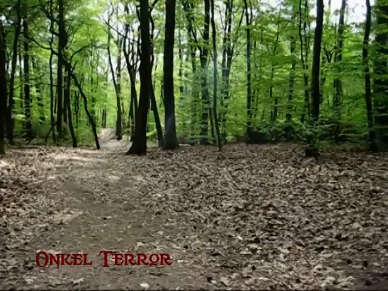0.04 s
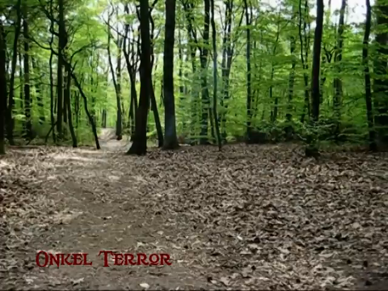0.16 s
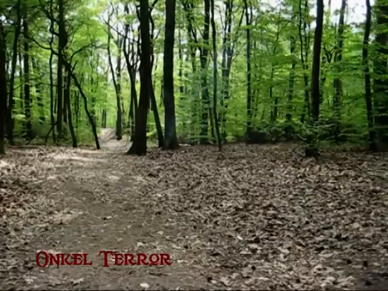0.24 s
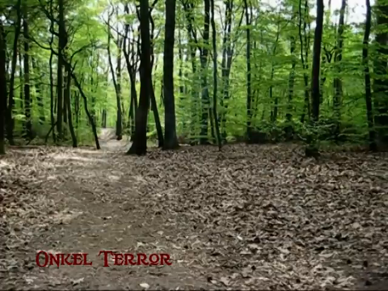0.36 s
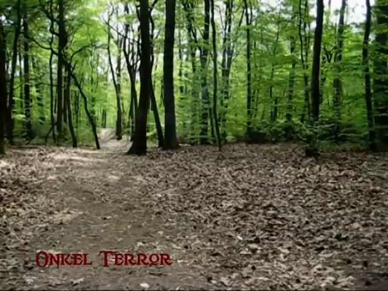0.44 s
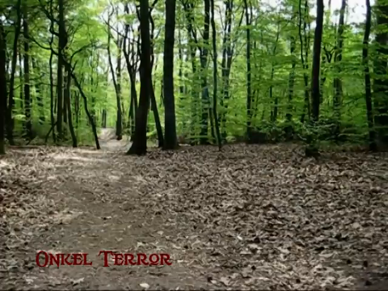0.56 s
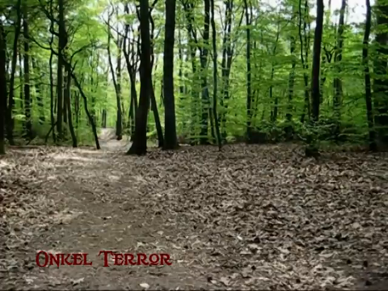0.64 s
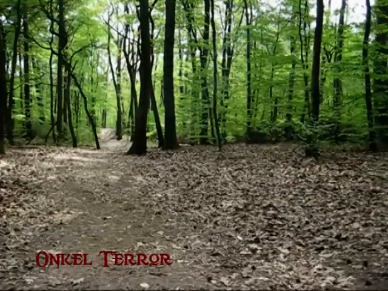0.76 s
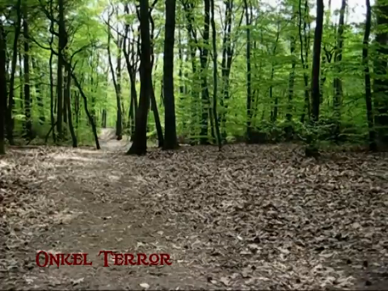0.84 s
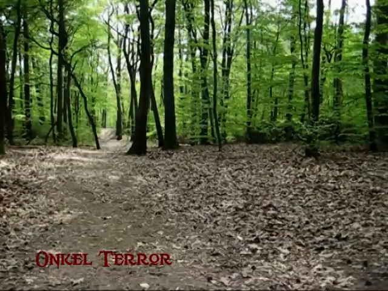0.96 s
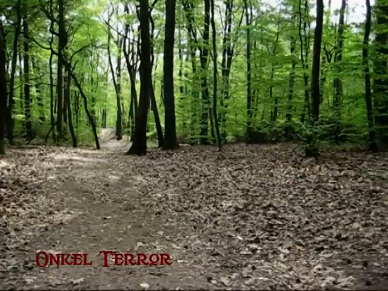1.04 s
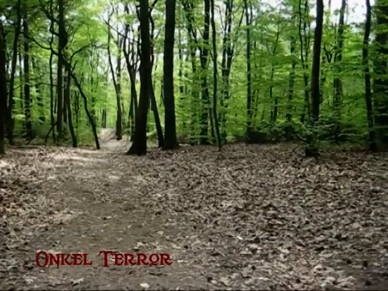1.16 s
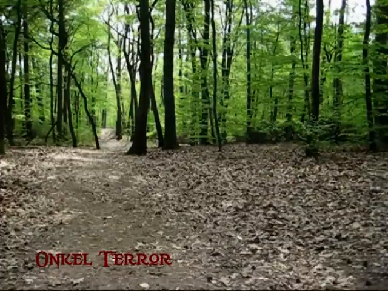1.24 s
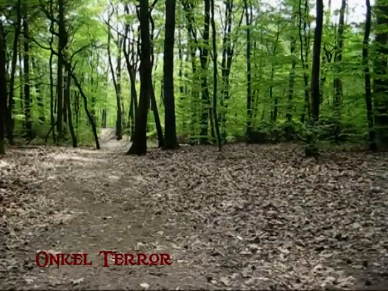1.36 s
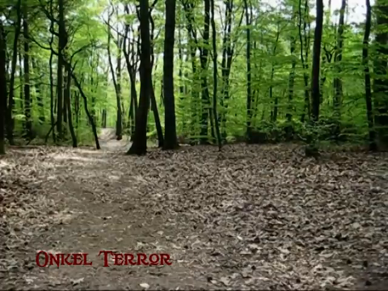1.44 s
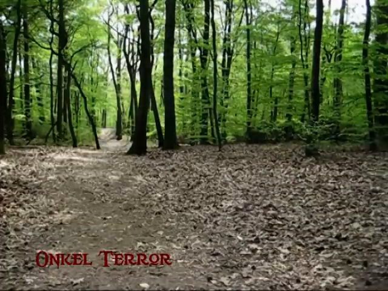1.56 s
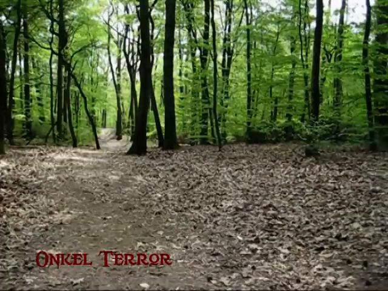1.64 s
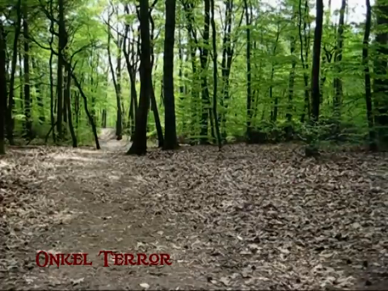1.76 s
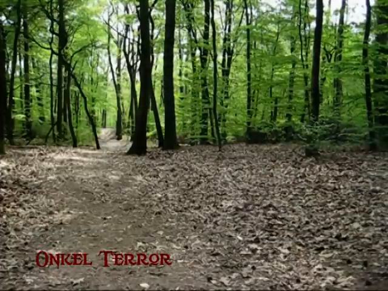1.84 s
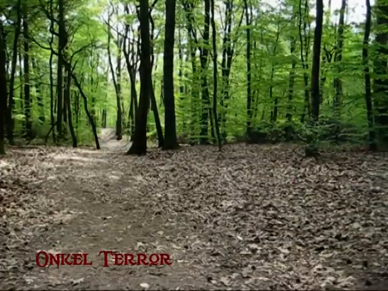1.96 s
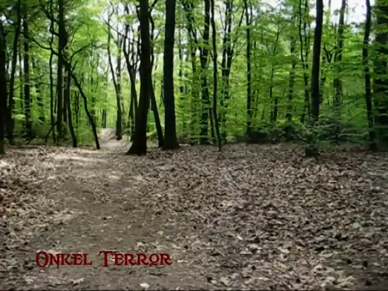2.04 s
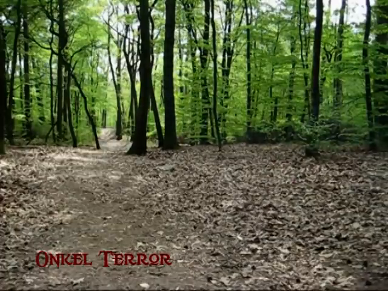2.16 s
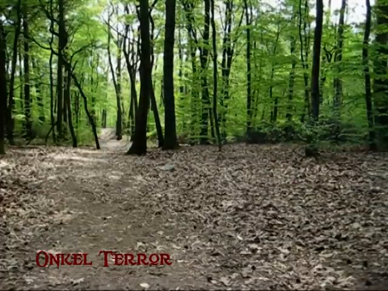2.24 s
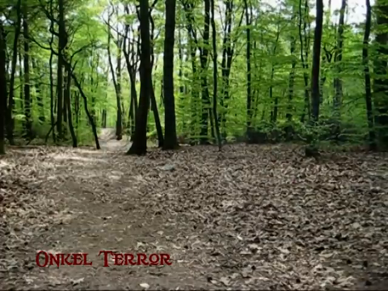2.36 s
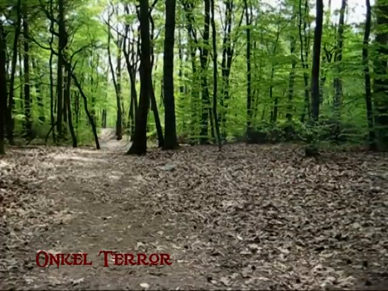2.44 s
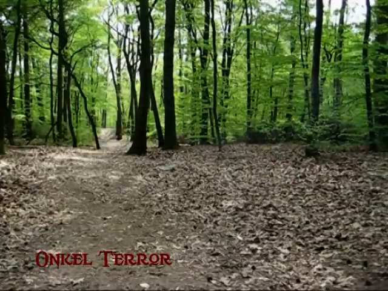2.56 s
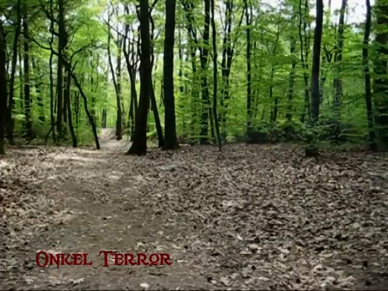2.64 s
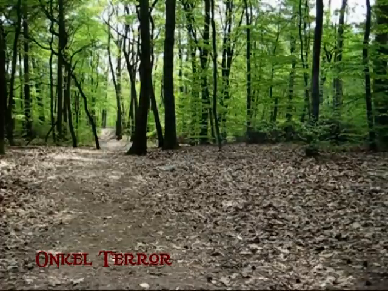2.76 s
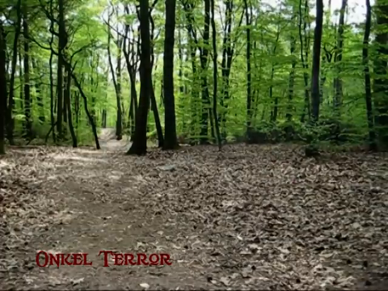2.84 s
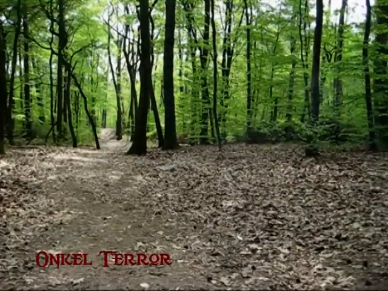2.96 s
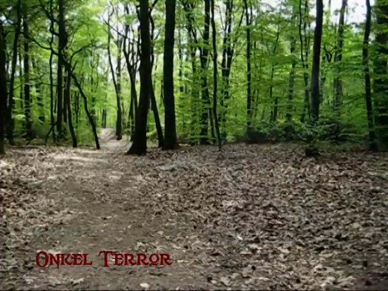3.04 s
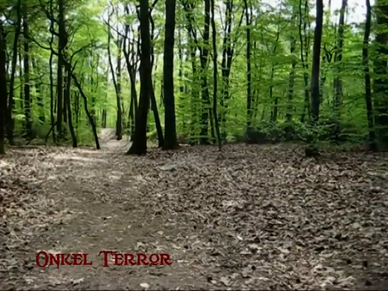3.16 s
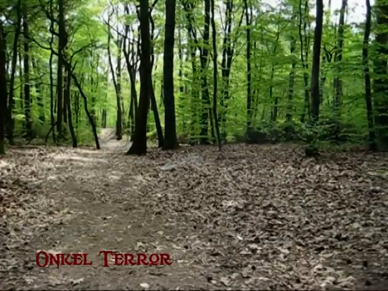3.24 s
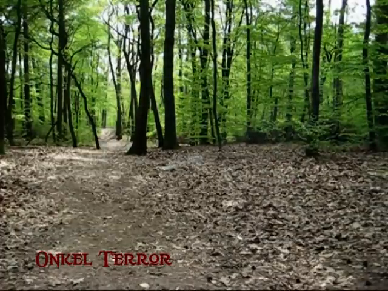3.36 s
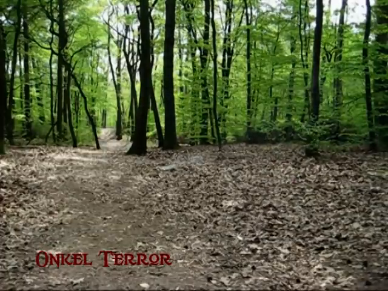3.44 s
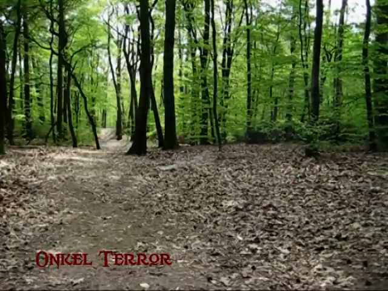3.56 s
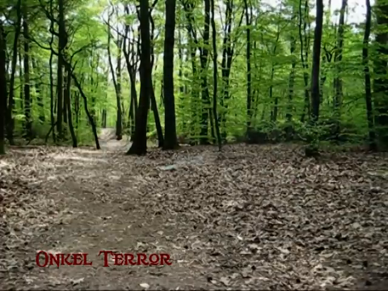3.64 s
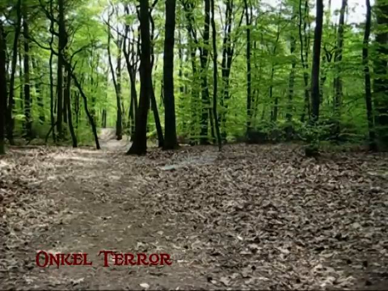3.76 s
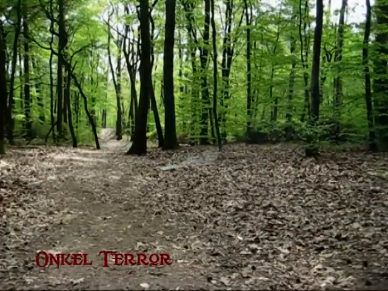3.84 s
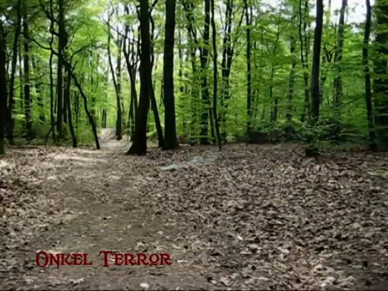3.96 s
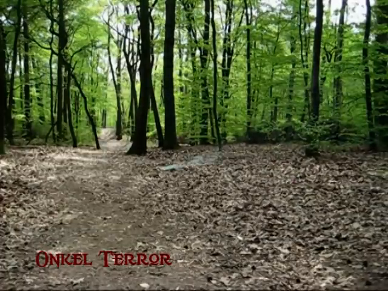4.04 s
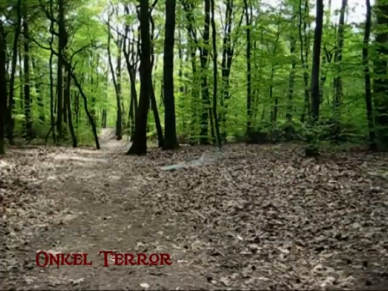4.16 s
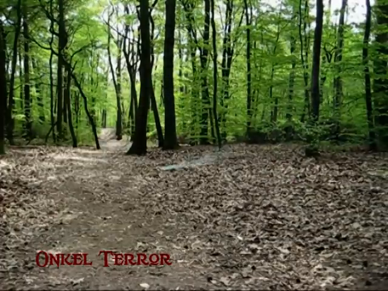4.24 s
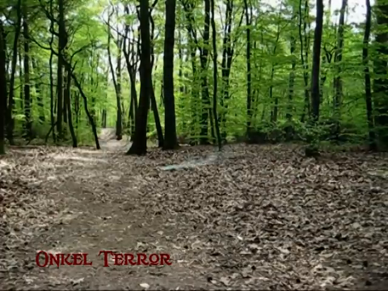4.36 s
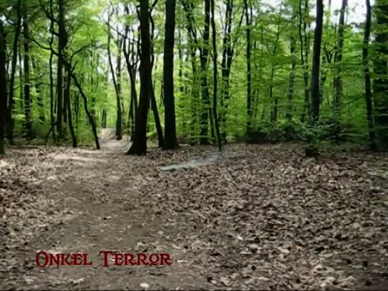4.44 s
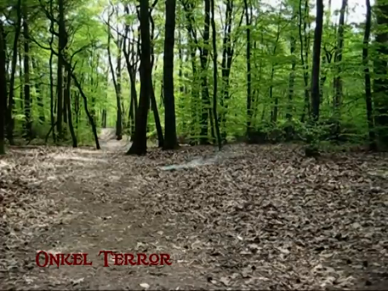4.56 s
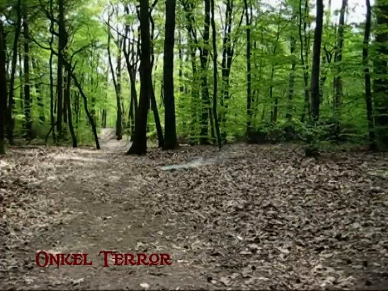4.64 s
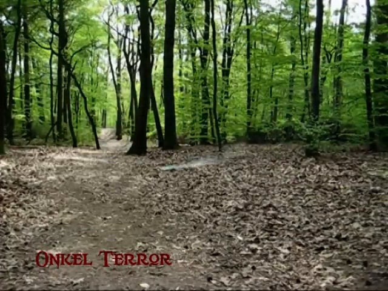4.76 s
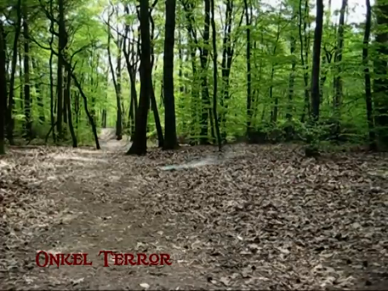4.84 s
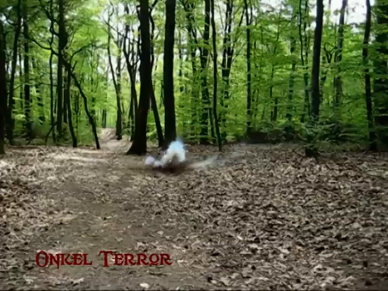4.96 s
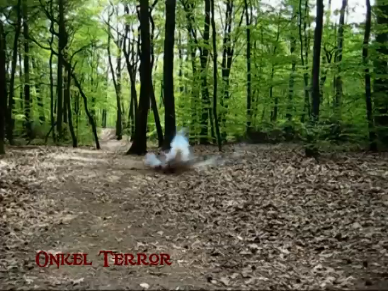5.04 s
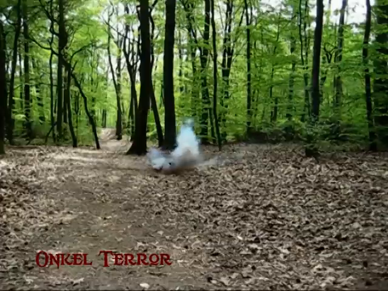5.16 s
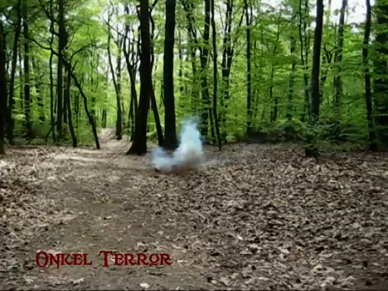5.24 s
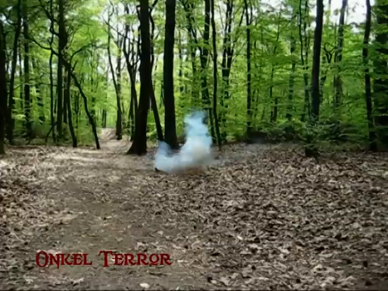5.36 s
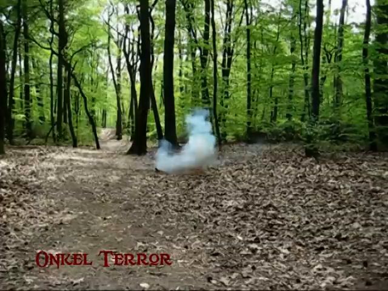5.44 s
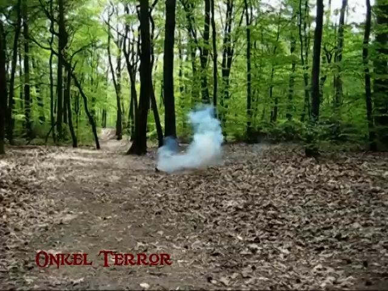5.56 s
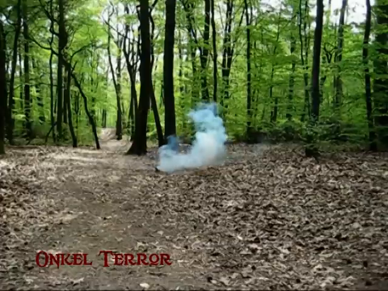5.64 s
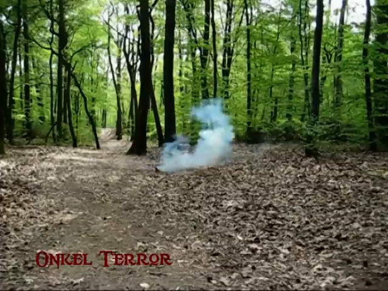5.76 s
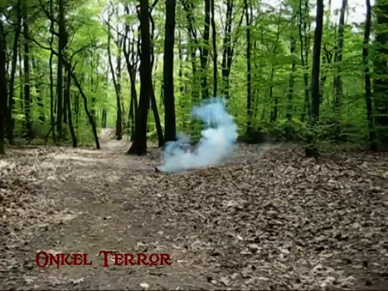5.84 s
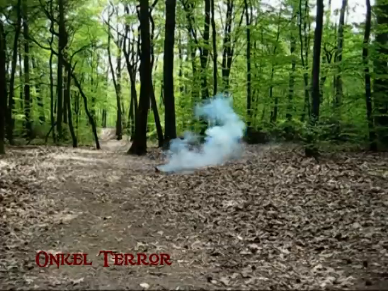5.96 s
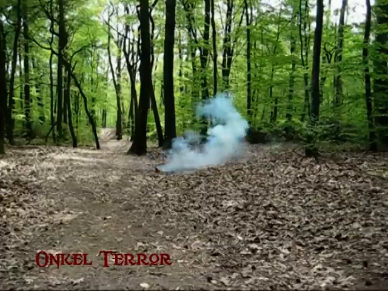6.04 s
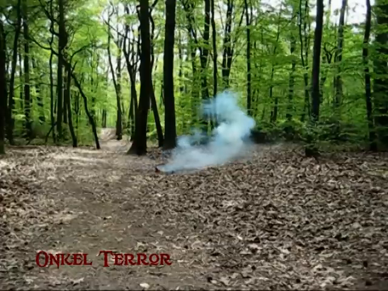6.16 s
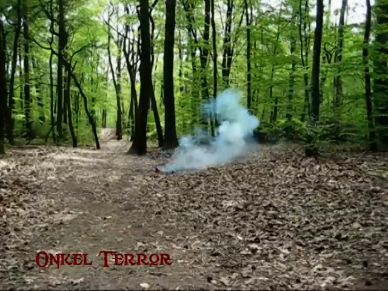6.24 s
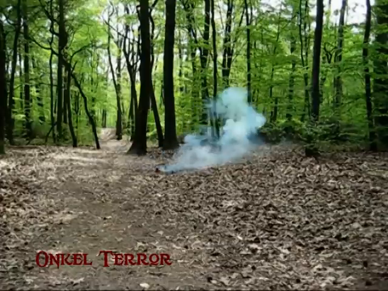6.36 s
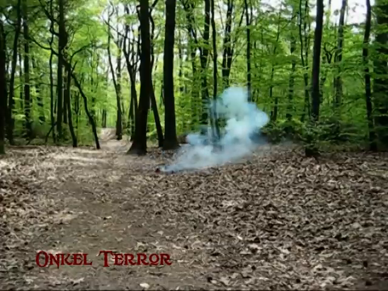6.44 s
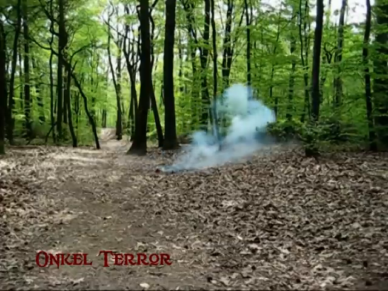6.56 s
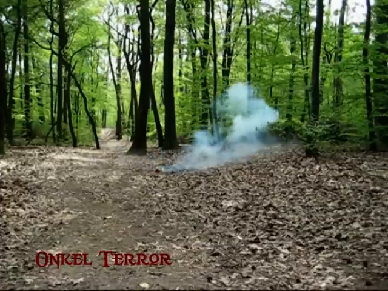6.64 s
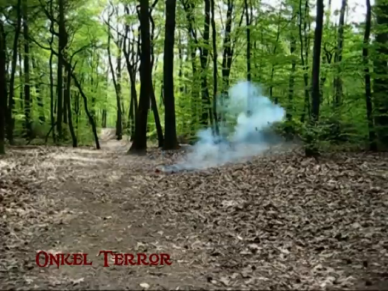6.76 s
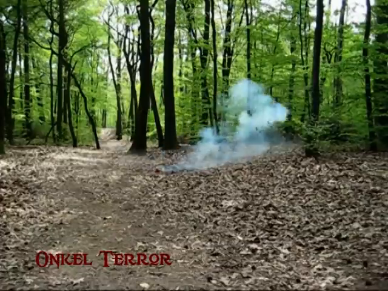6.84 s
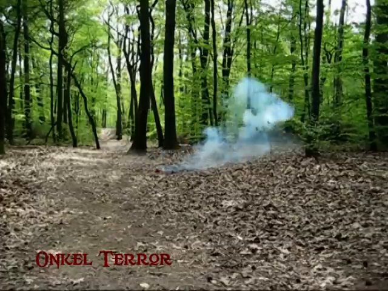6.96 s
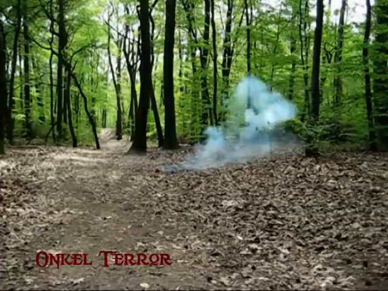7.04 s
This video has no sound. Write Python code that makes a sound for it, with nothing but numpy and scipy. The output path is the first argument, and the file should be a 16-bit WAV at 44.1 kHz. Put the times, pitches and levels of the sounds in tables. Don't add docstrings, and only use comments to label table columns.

```python
import sys
import numpy as np
from scipy import signal
from scipy.fft import rfft, irfft, next_fast_len
from scipy.io import wavfile
from scipy.ndimage import uniform_filter1d, map_coordinates

SR = 44100
rng = np.random.default_rng(int(sys.argv[2]) if len(sys.argv) > 2 else 0)


def linear_from_db(decibels):
    return 10 ** (np.asarray(decibels, float) / 20)


def pcm_store(signal):
    levels = np.round(np.clip(np.atleast_2d(signal), -1, 1) * 32767)
    wavfile.write(sys.argv[1], SR, levels.astype(np.int16).T)


N = 313154
TIME = np.arange(N) / SR
FFT_SIZE = next_fast_len(N)
BURST_S = 4.9146


def unit(x):
    return x / np.sqrt(np.mean(x ** 2) + 1e-20)


def along(points, hz):
    f, *cols = np.transpose(points)
    return [np.interp(np.log(hz + 1), np.log(f + 1), c) for c in cols]


def coloured(x, spectrum):
    gain_db = along(spectrum, np.fft.rfftfreq(FFT_SIZE, 1 / SR))[0]
    return irfft(rfft(x, FFT_SIZE) * linear_from_db(gain_db), FFT_SIZE)[..., :N]


def wobble(rate):
    knots = rng.standard_normal(int(N * rate / SR) + 4)
    return map_coordinates(knots, [TIME * rate])


def rush(spectrum, patchy_db=0., spit_db=0.):
    noise = rng.standard_normal(N)
    if spit_db:
        noise = noise * linear_from_db(spit_db * wobble(400))
    _, _, z = signal.stft(noise, SR, nperseg=512)
    field = uniform_filter1d(rng.standard_normal(z.shape), size=8, axis=0)
    field = unit(uniform_filter1d(field, size=12, axis=1))
    patchy = signal.istft(z * linear_from_db(patchy_db * field), SR, nperseg=512)[1][:N]
    return unit(coloured(patchy, spectrum))


def bursts(times, dbs, t60s, rise):
    env = np.zeros(N)
    for s, db, t60 in zip(times, dbs, t60s):
        first = round(s * SR)
        t = TIME[first:][:SR // 4] - s
        decay = linear_from_db(db - 60 * t / np.clip(t60, .002, .3))
        env[first:][:len(t)] += decay * (1 - np.exp(-np.abs(t) / rise))
    return env


# pitch_hz, density_db
AIR_SPECTRUM = [(15, -23), (25, -13), (100, -4), (300, -3.5), (1500, -4.5), (5000, -13.5), (10000, -34),
                (16000, -25)]


def far_air():
    return linear_from_db(-41.5 + 0.33 * wobble(3.2)) * rush(AIR_SPECTRUM, patchy_db=3.1)


def breeze():
    sets_in = np.clip((TIME - 2.5) / .2, 0, 1)
    push = rush([(30, -25), (70, -3), (100, 1), (150, -22), (300, -120)])
    return sets_in * linear_from_db(-59 + 3.8 * wobble(5.4)) * push


def bird():
    start_s, length_s, pitch_hz, edge_s = 2.81, .22, 3335, .02
    held = np.clip(np.minimum(TIME - start_s, start_s + length_s - TIME) / edge_s, 0, 1)
    tone = np.sin(2 * np.pi * pitch_hz * TIME + 0.69 * wobble(8))
    return held * linear_from_db(-42.5 + 1.4 * wobble(25)) * tone


# start_s, tick_db, tap_db
LANDINGS = [(5.3208, -32, -18), (5.3454, -27, -25), (5.5189, -33, -28), (5.697, -17, -23),
            (5.7533, -25, -26), (5.8232, -14.5, -19), (5.834, -28, -23), (5.8724, -24, -24.5),
            (5.9085, -31, -25), (5.92, -37, -28), (5.9768, -23, -25), (6.0084, -32, -22),
            (6.0716, -25, -22), (6.129, -39, -23), (6.1564, -39, -39), (6.2104, -30, -33),
            (6.219, -25, -28), (6.3214, -39, -34), (6.3634, -42, -39), (6.3774, -23, -30),
            (6.397, -46, -27), (6.4654, -40, -25), (6.7516, -34, -37), (6.8792, -31.5, -26.5),
            (6.9711, -37, -37)]
# pitch_hz, density_db
LEAF_SPECTRUM = [(4000, -30), (7000, 1.5), (9000, -1), (12000, 0.5), (14000, -2), (16000, -16)]
# pitch_hz, density_db
TAP_SPECTRUM = [(1200, -30), (2800, 4), (5000, 2), (7500, -9), (11000, -31)]
# pitch_hz, density_db
CRUMB_SPECTRUM = [(800, -17), (2500, 7), (4000, -0.5), (7000, -8.5), (11000, -15.5), (16000, -19)]


def litter():
    s, tick_db, tap_db = np.transpose(LANDINGS)
    t60 = 0.068 + .0015 * np.maximum(tick_db + 35, 0)
    ticks = bursts(s, tick_db - 7.5, 0.68 * t60, rise=0.00092) * rush(LEAF_SPECTRUM, spit_db=4.0)
    settling = bursts(s, tick_db - 16.5, np.full_like(s, 0.25), rise=.008) * rush(LEAF_SPECTRUM, spit_db=7.0)
    taps = bursts(s, tap_db + .6, 0.5 * t60, rise=0.00065) * rush(TAP_SPECTRUM, spit_db=4.0)
    densest_s, thickens_db_s, thins_db_s = 5.504, 25, 10.6
    since = TIME - densest_s
    crumbs_db = -26 + np.minimum(thickens_db_s * since, -thins_db_s * since)
    crumbs = linear_from_db(crumbs_db + wobble(40)) * rush(CRUMB_SPECTRUM, patchy_db=0.5, spit_db=1)
    return ticks + settling + taps + crumbs


# pitch_hz, density_db
WOOD_SPECTRUM = [(20, -44), (70, -26.5), (137, -24.5), (256, -7.5), (468, -1.5), (4380, -2.5), (9000, -11),
                 (16000, -26)]


def wood():
    bass_t60, shortest_t60 = 3.704, 0.58
    absorb_hz, absorb_power = 2854, 2.56
    hz, t, z = signal.stft(rush([(20, 0)], patchy_db=0.17, spit_db=1.0), SR, nperseg=1024)
    t60 = shortest_t60 + (bass_t60 - shortest_t60) / (1 + (hz / absorb_hz) ** absorb_power)
    age = np.maximum(t - BURST_S, 0)
    level_db = along(WOOD_SPECTRUM, hz)[0][:, None] - 60 * age / t60[:, None]
    tail = signal.istft(z * linear_from_db(level_db), SR, nperseg=1024)[1][:N]
    build_up = 1 - np.exp(-np.maximum(TIME - BURST_S, 0) / .035)
    return linear_from_db(16.5) * tail * build_up


# start_s, crunch_db, thud_db
GROUND_KNOCKS = [
    (.1785, -14, -31),
    (1.512, -60, -28),
    (2.163, -60, -31),
    (2.197, -23, -42),
]
# pitch_hz, density_db
CRUNCH_SPECTRUM = [(300, -5), (1000, -2), (4000, -1.5), (9000, -8), (13000, -8), (16000, -15)]


def knocks():
    s, crunch_db, thud_db = np.transpose(GROUND_KNOCKS)
    crunch = bursts(s, crunch_db, np.full_like(s, .035), rise=.0012) * rush(CRUNCH_SPECTRUM)
    thud = bursts(s, thud_db + 1.5, np.full_like(s, 0.039), rise=0.0033)
    return crunch + thud * np.sin(2 * np.pi * 250 * TIME)


# pitch_hz, density_db
AWAY_SPECTRUM = [(300, -40), (900, -17), (1300, -5.5), (1900, 1.5), (4000, -1.5), (5600, -8), (7000, -19),
                 (16000, -45)]
# pitch_hz, density_db
SIDE_SPECTRUM = [(300, -45), (1000, -26), (1500, -12), (2200, 3.5), (4200, -0.5), (6000, -2), (7000, -16),
                 (16000, -40)]
# pitch_hz, density_db
NOZZLE_SPECTRUM = [(3000, -19), (5500, -7), (8000, -4.5), (11000, -7), (13500, -14), (16000, -18)]
# start_s, end_s, jet_db, bright_db, detour_ms
TUMBLES = [
    (0.124, 0.182, -26, -45, 0.023),
    (0.193, 0.418, -20.5, -32.5, .138),
    (0.401, 0.545, -25.5, -29.5, 0.13),
    (0.526, 0.705, -29.5, -29, .12),
]


def flight():
    land_s, scuff_s = .18, .385
    start, end, jet_db, bright_db, high_ms = np.transpose(TUMBLES)[..., None]
    part = np.clip((TIME - start) / (end - start), 0, 1)
    arc = 4 * part * (1 - part)

    falling = np.clip((land_s - TIME) / 0.011, 0, 1)
    thrown = falling * linear_from_db(-21 - 57 * TIME) * rush(AWAY_SPECTRUM, spit_db=1.0)
    thrown_shine = falling * linear_from_db(-36.5 - 92 * TIME)

    swell = np.sum(linear_from_db(jet_db) * arc ** 0.67, axis=0)
    shine = thrown_shine + np.sum(linear_from_db(bright_db) * arc ** 0.63, axis=0)
    jet = thrown + swell * rush(SIDE_SPECTRUM, patchy_db=1.0, spit_db=1.0)

    lying_ms, fall_ms_s = .135, 2.85
    detour_ms = lying_ms + fall_ms_s * np.maximum(land_s - TIME, 0) + np.sum(high_ms * arc, axis=0)
    echo = np.select([TIME < land_s, TIME < scuff_s], [.68, .95], .4)
    mirrored = map_coordinates(jet, [np.arange(N) - detour_ms * SR / 1000], mode="nearest")
    mirrored = uniform_filter1d(mirrored, size=3)
    combed = (jet + echo * mirrored) / np.sqrt(1 + echo ** 2)
    return combed + shine * rush(NOZZLE_SPECTRUM, patchy_db=1.3, spit_db=1.5)


# peak_s, level_db
FLARES = [
    (.78, -0.5),
    (1.5, 1),
    (2.4, 0.8),
    (3.13, 1),
    (4.1, 1.5),
]
# pitch_hz, density_db
ROAR_SPECTRUM = [(180, -28), (300, -7.5), (540, -4), (981, 1), (2230, -2.5), (3000, -30), (3900, -28),
                 (6600, -120)]
# pitch_hz, density_db
BODY_SPECTRUM = [(1470, -23), (2500, -4.5), (3860, -1.5), (6050, -8.5), (6610, -16.5), (6900, -11.5),
                 (8970, -40), (15200, -120)]
# pitch_hz, density_db
FIZZ_SPECTRUM = [(3880, -33), (6600, -8.5), (7800, 0), (9880, -2), (11300, 1.5), (14100, -2), (15400, -4.5),
                 (16000, -40)]


def burning():
    flare_width_s = 0.19
    flares = sum(db * np.exp(-((TIME - s) / flare_width_s) ** 2) for s, db in FLARES)
    flow_db = flares + 0.21 * wobble(3.5) + .5 * wobble(12)
    settled = np.clip((TIME - .4) / 0.15, 0, 1)
    age = TIME - 1
    roar = linear_from_db(-36.98 - 0.39 * age + flow_db) * rush(ROAR_SPECTRUM, patchy_db=0.5, spit_db=0.04)
    body = linear_from_db(-33.5 - 2.33 * age + flow_db) * rush(BODY_SPECTRUM, patchy_db=0.16, spit_db=0.7)
    fizz = linear_from_db(-38.59 - 0.82 * age + flow_db) * rush(FIZZ_SPECTRUM, patchy_db=0.1, spit_db=0.86)
    return (roar + settled * (body + fizz)) * (TIME < BURST_S)


# start_s, swing_db, swing_hz
TRUNK_ECHOES = [
    (4.9248, 26, 1600),
    (4.9315, 30, 1400),
    (4.9435, 28, 3300),
    (4.9443, 29, 1500),
    (4.9479, 18, 3500),
    (4.9588, 21, 3500),
]


def trunk_echoes(ragged):
    out = np.zeros(N)
    for s, db, hz in TRUNK_ECHOES:
        swing = linear_from_db(db) * np.sin(2 * np.pi * hz * (TIME - s))
        edge = linear_from_db(9 + .3 * db) * ragged
        out += bursts([s], [0], [.002 + 3.5 / hz], rise=.0002) * (swing + edge)
    return out


# pitch_hz, density_db
SHOCK_SPECTRUM = [(20, -25), (100, -10), (300, -3), (1200, 0), (3000, -1), (5000, -9), (8000, -20),
                  (16000, -42)]


def blast():
    ragged = rush(SHOCK_SPECTRUM)
    swing = bursts([BURST_S], [16], [.03], rise=.0002) * np.sin(2 * np.pi * 345 * (TIME - BURST_S))
    edge = bursts([BURST_S], [16], [.09], rise=.0002) * ragged
    ground = rush([(30, -29), (100, -16), (170, -5), (420, -3), (900, -26)])
    heave = bursts([BURST_S], [13], [.15], rise=0.0039) * ground
    return swing + edge + trunk_echoes(ragged) + heave


def scene():
    background = far_air() + breeze() + bird() + litter() + wood()
    firecracker = knocks() + flight() + burning() + blast()
    return (background + firecracker)[None]


def gain_control_db():
    duck_s, ramp_s, duck_db = 4.917, .007, -20
    sag_db, sag_s = -6, 0.065
    climb_db_s, rest_db = 24.5, 0.35
    age = np.maximum(TIME - duck_s, 0)
    sag = sag_db * (age / sag_s) ** 2 * np.exp(2 * (1 - age / sag_s))
    return np.clip(age / ramp_s, 0, 1) * np.minimum(duck_db + sag + climb_db_s * age, rest_db)


# pitch_hz, density_db
HISS_SPECTRUM = [(15, -15), (60, 5.5), (200, -21), (2000, -26), (8000, -24), (13000, -19), (16000, -26)]


def recorder_noise():
    return linear_from_db(-57.0) * rush(HISS_SPECTRUM)


# pitch_hz, gain_db
CONVERTER_RESPONSE = [(9000, 0), (12000, -2), (15000, -6), (15750, -8), (15850, -100)]


def converter(x):
    return coloured(x, CONVERTER_RESPONSE)


def roll_off(x):
    return signal.sosfilt(signal.butter(12, 16650, fs=SR, output="sos"), x)


def record(dry):
    overloaded = np.clip(dry * linear_from_db(gain_control_db()) + recorder_noise(), -1, 1)
    return roll_off(converter(overloaded))


dry = scene()
out = record(dry)
pcm_store(out)
```